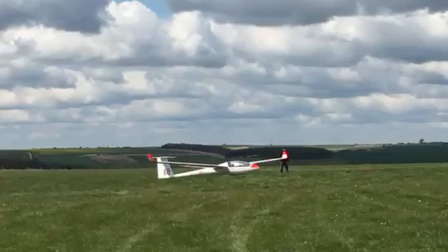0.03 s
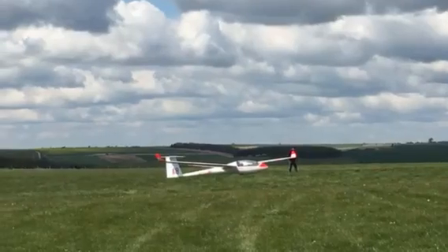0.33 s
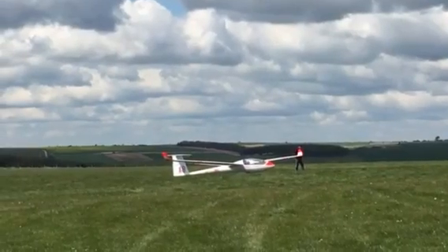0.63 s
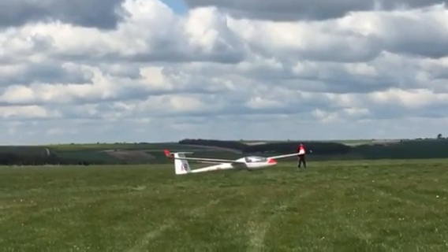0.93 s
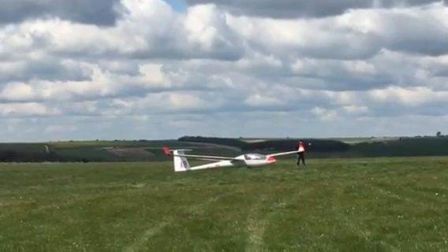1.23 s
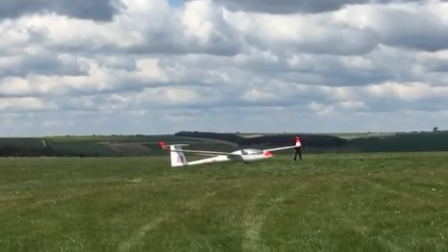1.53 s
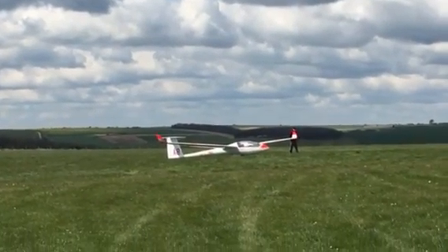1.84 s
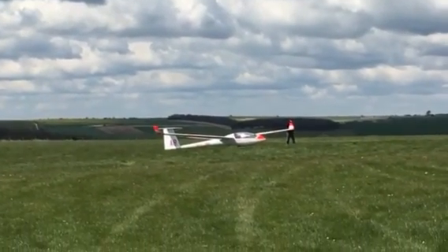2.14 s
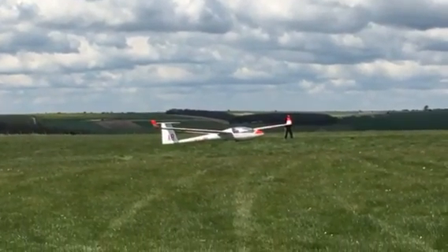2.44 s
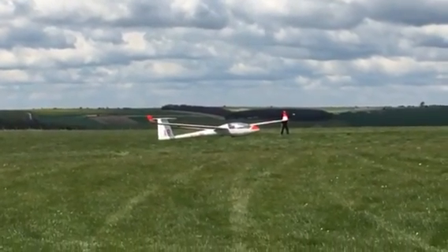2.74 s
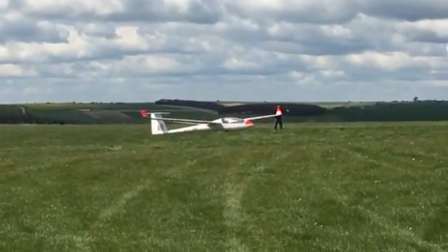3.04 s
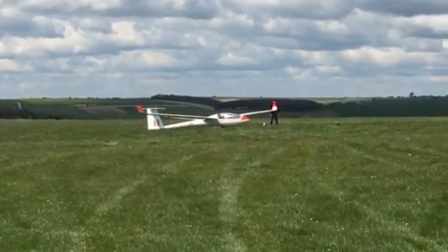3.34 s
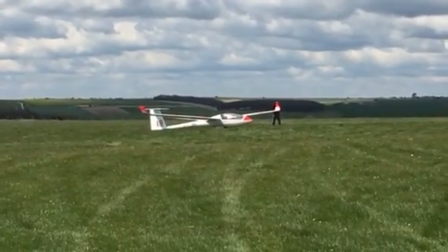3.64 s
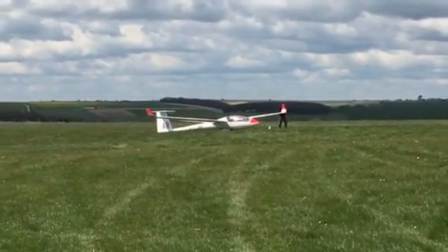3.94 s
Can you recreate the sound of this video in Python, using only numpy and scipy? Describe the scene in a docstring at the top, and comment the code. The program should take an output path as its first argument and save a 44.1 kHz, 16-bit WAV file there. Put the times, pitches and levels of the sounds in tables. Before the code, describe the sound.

Gusty wind buffets the microphone, rumbling and growing stronger and choppier.

```python
"""Gusty wind on an open grass airfield, blowing straight across a camera microphone.
From the first gust, eddies sweep over the port, louder and higher the faster the air, and large slow
ones rumble underneath. Around one second the wind murmurs in a lull, far grass and faint hiss behind.
Then it grows stronger and choppier: buffets rasp and the hardest thump the diaphragm.
From 2.7 s on they also overload the input, which crackles."""
import sys
import numpy as np
from scipy import signal
from scipy.fft import rfft, irfft
from scipy.io import wavfile
from scipy.ndimage import uniform_filter1d, minimum_filter1d, map_coordinates

SR = 44100
rng = np.random.default_rng(int(sys.argv[2]) if len(sys.argv) > 2 else 0)


def dump_mix(stems):
    """Bounce the given channels to the path in sys.argv[1] as a 16-bit WAV at rate SR."""
    frames = np.atleast_2d(stems).T  # one column per channel
    limited = np.clip(frames, -1, 1)  # hard clip at full scale
    pcm = np.round(limited * 32767).astype(np.int16)
    wavfile.write(sys.argv[1], SR, pcm)


N = 176400

# wind at the microphone between buffets: (time [s], force [dB])
GUST_FORCE = [(0.13, -35), (0.17, -54), (0.29, -64.5), (0.36, -49), (0.52, -58.5), (0.89, -51.5),
              (0.95, -71.5), (1.31, -62.5), (1.42, -47.5), (1.52, -33), (1.68, -41), (1.79, -51),
              (1.9, -50), (1.99, -29), (2.08, -49), (2.15, -60), (2.3, -35), (2.42, -46.5), (2.52, -57),
              (2.685, -67.5), (2.71, -32), (2.83, -40), (3.02, -37), (3.14, -47.5), (3.36, -28),
              (3.49, -29), (3.58, -42), (3.65, -35), (3.78, -18.5), (3.89, -24), (3.95, -38.5),
              (4.0, -28.5)]
# short surges of air on the port: (middle [s], length [s], force [dB])
BUFFETS = [(0.245, 0.01, -33), (0.336, 0.026, -33), (0.407, 0.014, -37), (0.434, 0.024, -41),
           (0.486, 0.027, -39), (0.555, 0.034, -42.5), (0.592, 0.021, -42.5), (0.676, 0.017, -40),
           (0.701, 0.012, -34), (0.759, 0.024, -42.5), (0.82, 0.028, -31), (0.864, 0.035, -34.5),
           (1.163, 0.038, -48), (1.238, 0.02, -49), (1.357, 0.012, -30.5), (1.446, 0.022, -31),
           (1.471, 0.012, -28), (1.502, 0.013, -20.5), (1.558, 0.028, -24.5), (1.58, 0.011, -29),
           (1.596, 0.012, -26), (1.621, 0.036, -24.5), (1.924, 0.018, -27.5), (1.994, 0.02, -31.5),
           (2.042, 0.027, -24.5), (2.11, 0.01, -34.5), (2.179, 0.02922, -25.5), (2.209, 0.022, -29.5),
           (2.258, 0.015, -28), (2.28, 0.022, -33), (2.329, 0.028, -27), (2.387, 0.031, -20),
           (2.438, 0.042, -26.5), (2.48, 0.027, -29.5), (2.595, 0.046, -45), (2.723, 0.018, -11),
           (2.741, 0.017, -13.5), (2.761, 0.023, -21), (2.789, 0.032, -16), (2.846, 0.028, -26),
           (2.873, 0.03, -25.5), (2.903, 0.012, -25), (2.962, 0.027, -22), (2.997, 0.0398, -23),
           (3.047, 0.028, -23.5), (3.091, 0.013, -24), (3.114, 0.02, -18.5), (3.168, 0.017, -19),
           (3.23, 0.03, -22.5), (3.265, 0.024, -12), (3.299, 0.017, -9.5), (3.345, 0.015, -17),
           (3.403, 0.03, -16), (3.461, 0.031, -13.5), (3.486, 0.0078, -12.5), (3.541, 0.048, -19),
           (3.609, 0.0076, -12.5), (3.641, 0.012, -26), (3.696, 0.048, -18), (3.73, 0.027, -15.5),
           (3.79, 0.059, -15.5), (3.844, 0.023, -18.5), (3.91, 0.034, -16.5), (3.981, 0.044, -15.5)]
# pattern of eddies at air speed 1: (frequency [Hz], relative level [dB])
EDDY_SPECTRUM = [(40, -7), (130, 0.5), (300, -2.5), (600, -11), (1000, -18.5), (1500, -30), (2200, -42),
                 (3200, -55), (5000, -78.5), (9000, -112)]
# how fast and loud the eddies pass at each force: (force [dB], air speed [ratio], level [dB])
AIRFLOW = [(-75, .165, -41.5), (-50, .37, -29), (-35, .61, -21), (-25, .96, -17), (-17, 1.45, -18),
           (-8, 2.1, -9.5)]
# finest eddies missing from gentle air: (force [dB], share missing [0-1])
SMOOTHNESS = [(-32, 0.4), (-16, 0)]
# colour of the microphone port: (frequency [Hz], gain [dB])
PORT_RESPONSE = [(20, -20), (45, -18.5), (90, 1.5), (170, 2), (330, 1.5), (490, 0), (700, 2), (1100, 5),
                 (2200, 4), (5000, 2.5), (12000, 3)]
# push of the large slow eddies: (time [s], relative level [dB])
RUMBLE_LEVEL = [(0.13, -21.5), (0.22, -35.5), (0.26, -19.5), (0.29, -63), (0.33, -20), (0.55, -33),
                (0.67, -22.5), (0.89, -27.5), (0.94, -34.5), (1.13, -41), (1.16, -19), (1.21, -50.5),
                (1.24, -23.5), (1.31, -37.5), (1.39, -19), (1.44, -30), (1.57, -17.5), (1.83, -39.5),
                (2.04, -20.5), (2.08, -34), (2.11, -21), (2.16, -42), (2.2, -19), (2.24, -27),
                (2.37, -18.5), (2.52, -31), (2.58, -24.5), (2.67, -35.5), (2.71, -16), (2.97, -20.5),
                (3.77, -23), (3.85, -17), (3.95, -28.5), (4.0, -16)]
# colour of their rumble: (frequency [Hz], relative level [dB])
RUMBLE_SPECTRUM = [(15, -41), (28, -26), (45, -7), (70, 0.5), (120, -10), (200, -21.5), (400, -45.5),
                   (1000, -86)]
# wind in the grass, far off: (frequency [Hz], relative level [dB])
GRASS_SPECTRUM = [(200, 0), (700, 2), (1300, -2), (2600, -11), (4000, -30.5)]
# faint background hiss: (time [s], level [dB])
HISS_LEVEL = [(.52, -69), (.54, -79), (1.34, -79), (1.36, -69), (2.7, -69), (2.9, -75), (4, -75)]
# colour of the hiss: (frequency [Hz], relative level [dB])
HISS_SPECTRUM = [(200, 2.5), (700, 2), (1500, 4.5), (4200, 0), (4900, -4.5), (5800, -1), (9500, -5),
                 (15500, -15)]
# hardest surges striking the diaphragm: (start [s], pitch [Hz], envelope peak [dB])
THUMPS = [(1.358, 84.02, -13.5), (1.385, 83.3, -8), (1.501, 123.3, -7), (1.553, 110.6, -7.5),
          (2.697, 77, -8), (2.734, 150.2, -9.5), (2.756, 140.3, -2.5), (2.788, 89.4, -4), (2.865, 76.9, -7),
          (3.015, 110.8, -7.5), (3.167, 105, -10), (3.297, 152, -9.5)]
# spits from the overloaded input: (middle [s], length [s], level [dB])
CRACKLES = [(2.721, .002, -43), (2.7269, 0.00082, -40), (2.9, 0.0015, -47), (3.11, 0.0015, -49),
            (3.174, 0.0011, -49.5), (3.269, 0.013, -48), (3.3022, 0.004, -45), (3.485, 0.0014, -45.5),
            (3.609, .0015, -45), (3.791, .03, -53.5)]
# colour of the crackle: (frequency [Hz], relative level [dB])
CRACKLE_SPECTRUM = [(500, -5.5), (2000, 2.5), (5000, -9), (8000, -17.5), (15500, -26.5)]

FLUTTER_DB, FLUTTER_HZ = 1.67, 129.7   # quick random unsteadiness of the force
FINE_HZ, CLUMP_DB, CLUMP_HZ = 930, 5.5, 209   # eddies finer than this clump: how unevenly, how quickly
FINEST_HZ = 2290   # eddies finer than this need strong wind to form fully
RUMBLE_GAIN_DB, GRASS_DB = 1, -72
START_S, FADE_IN_S = 0.119, 0.00067
LIMIT, LIMITER_S, CUTOFF_HZ = 0.71, 0.002, 16500


def from_db(db):
    """Decibels to gain."""
    return 10 ** (np.asarray(db) / 20)


def in_time(rows):
    """A curve of (time [s], value) rows at every sample."""
    return np.interp(np.arange(N) / SR, *np.transpose(rows))


def coloured(x, spectrum):
    """Filter by a curve of (frequency [Hz], gain [dB]) rows."""
    hz, db = np.transpose(spectrum)
    bin_hz = np.maximum(np.fft.rfftfreq(len(x), 1 / SR), 1)
    gain_db = np.interp(np.log(bin_hz), np.log(hz), db)
    return irfft(rfft(x) * from_db(gain_db), len(x))


def noise(spectrum):
    """Noise of a given colour, rms 1."""
    x = coloured(rng.standard_normal(N), spectrum)
    return x / x.std()


def drift(hz):
    """Smooth random wandering, rolled off above hz, spread 1."""
    lowpass = signal.butter(6, hz, fs=SR, output="sos")
    x = signal.sosfilt(lowpass, rng.standard_normal(N + SR))[SR:]
    return x / x.std()


def wind_force():
    """Force of the wind at the microphone in dB: gusts plus bell-shaped buffets, fluttering."""
    t = np.arange(N) / SR
    power = from_db(in_time(GUST_FORCE)) ** 2
    for middle, length, db in BUFFETS:
        bell = 1 / (1 + (2 * (t - middle) / length) ** 2) ** 2
        power += (from_db(db) * bell) ** 2
    return 10 * np.log10(power) + FLUTTER_DB * drift(FLUTTER_HZ)


def turbulence():
    """The pattern of eddies in the air: smooth large ones, and fine ones that come in clumps."""
    pattern = noise(EDDY_SPECTRUM)
    fine = coloured(pattern, [(FINE_HZ / 4, -40), (FINE_HZ, 0)])
    clumps = from_db(CLUMP_DB * np.minimum(drift(CLUMP_HZ), 2.5))
    return pattern - fine + fine * clumps / np.sqrt(np.mean(clumps ** 2))


def eddies(force_db):
    """Turbulence is carried right over the port: slow air murmurs, fast air rasps higher and louder."""
    forces, speeds, levels = np.transpose(AIRFLOW)
    speed = uniform_filter1d(np.interp(force_db, forces, speeds), size=64)
    level_db = uniform_filter1d(np.interp(force_db, forces, levels), size=64)
    missing = np.interp(force_db, *np.transpose(SMOOTHNESS))
    pattern = turbulence()
    finest = coloured(pattern, [(FINEST_HZ / 2, -40), (FINEST_HZ, 0)])
    travelled = np.cumsum(speed)
    pressure = map_coordinates(pattern, [travelled], order=3, mode="grid-wrap")
    rasp = map_coordinates(finest, [travelled], order=3, mode="grid-wrap")
    return coloured((pressure - missing * rasp) * from_db(level_db), PORT_RESPONSE)


def rumble():
    """Large eddies push slowly on the diaphragm."""
    return from_db(RUMBLE_GAIN_DB + in_time(RUMBLE_LEVEL)) * noise(RUMBLE_SPECTRUM)


def far_grass():
    """Wind in the grass far across the field: a soft, steady wash behind the lulls."""
    return from_db(GRASS_DB) * noise(GRASS_SPECTRUM)


def hiss():
    """A faint hiss in the background, dipping around the first long lull."""
    return from_db(in_time(HISS_LEVEL)) * noise(HISS_SPECTRUM)


def thumps(rise_cycles=0.58):
    """Hard surges thump the diaphragm: each swells within a cycle and dies away in a few more."""
    t, out = np.arange(N) / SR, np.zeros(N)
    for start, hz, db in THUMPS:
        cycles = np.clip((t - start) * hz, 0, 20)
        age = cycles / rise_cycles
        envelope = age * np.exp(1 - age)
        out += from_db(db) * envelope * np.sin(2 * np.pi * cycles)
    return out


def crackles():
    """The overloaded input spits, short and bright, at the tips of the hardest buffets."""
    t, envelope = np.arange(N) / SR, np.zeros(N)
    for middle, length, db in CRACKLES:
        offset = 2 * (t - middle) / length
        envelope += from_db(db) * np.exp(-np.minimum(offset ** 2, 20))
    return envelope * noise(CRACKLE_SPECTRUM)


def scene():
    """One microphone out in the open: wind right on it, the grass far behind."""
    mono = eddies(wind_force()) + rumble() + far_grass() + hiss() + thumps() + crackles()
    return mono[None]


def record(dry):
    """The sound starts abruptly, a quick limiter holds the peaks, the top is cut."""
    started = np.clip((np.arange(N) / SR - START_S) / FADE_IN_S, 0, 1)
    width = int(LIMITER_S * SR)
    needed_gain = LIMIT / np.maximum(np.abs(dry), LIMIT)
    held_gain = minimum_filter1d(needed_gain, 2 * width)
    smooth_gain = uniform_filter1d(uniform_filter1d(held_gain, width), width)
    lowpass = signal.cheby2(12, 70, CUTOFF_HZ, fs=SR, output="sos")
    return signal.sosfilt(lowpass, started * smooth_gain * dry)


dry = scene()
out = record(dry)
dump_mix(out)
```